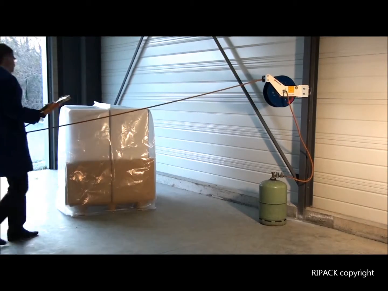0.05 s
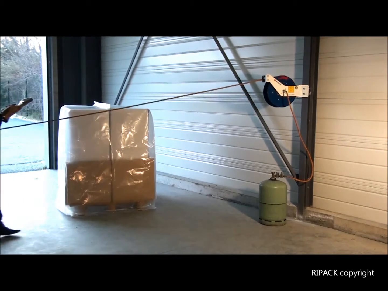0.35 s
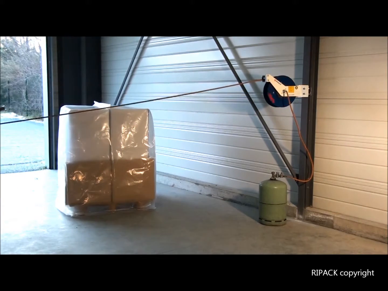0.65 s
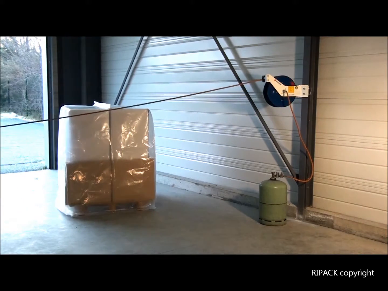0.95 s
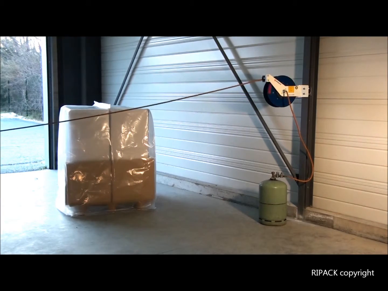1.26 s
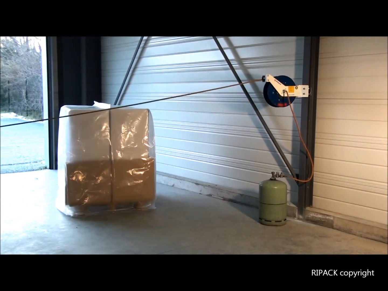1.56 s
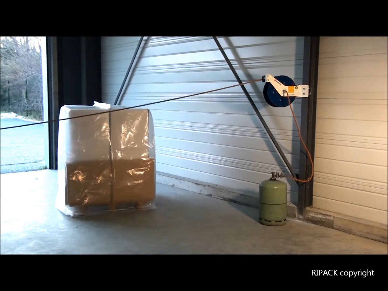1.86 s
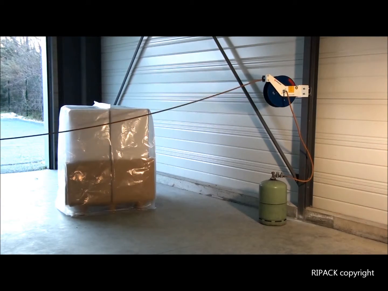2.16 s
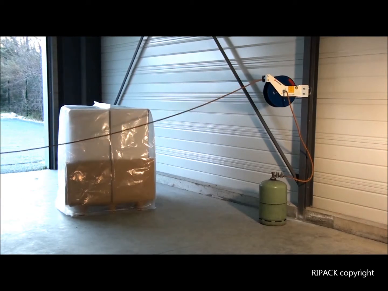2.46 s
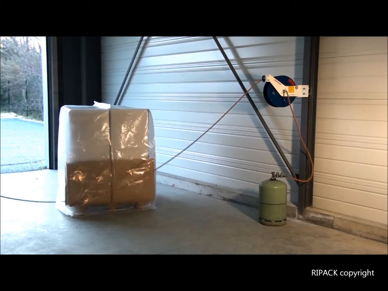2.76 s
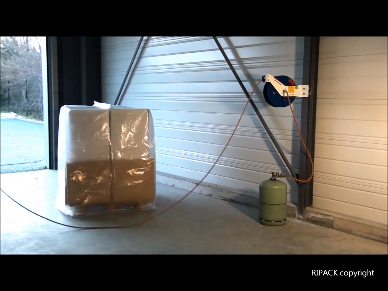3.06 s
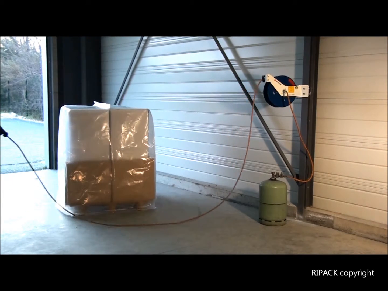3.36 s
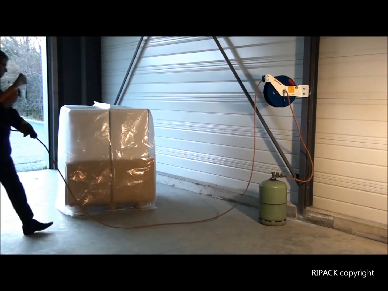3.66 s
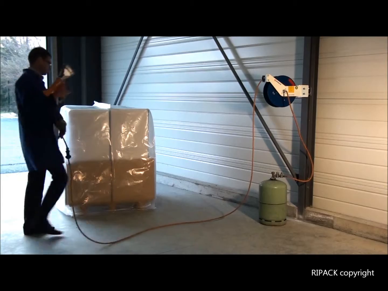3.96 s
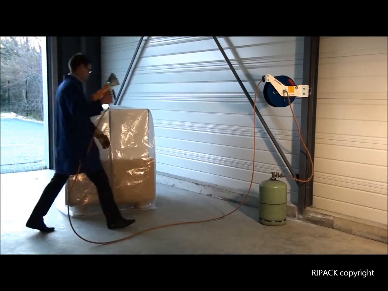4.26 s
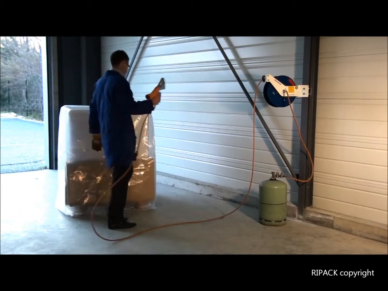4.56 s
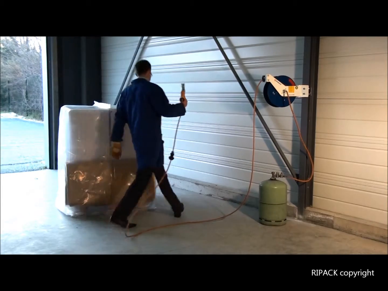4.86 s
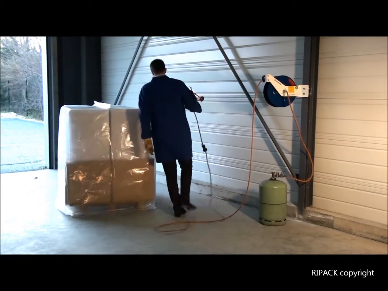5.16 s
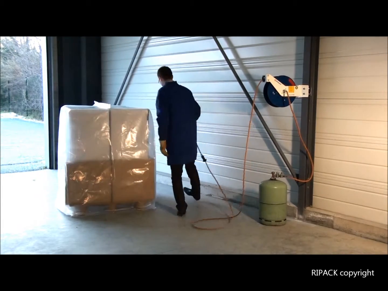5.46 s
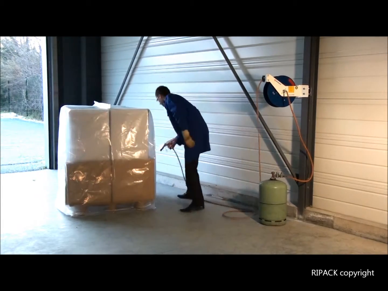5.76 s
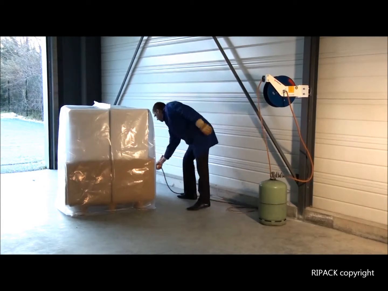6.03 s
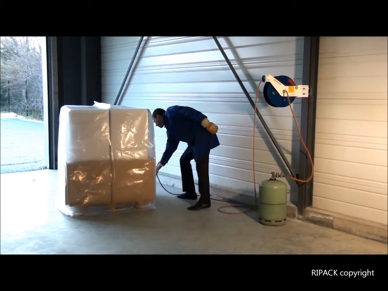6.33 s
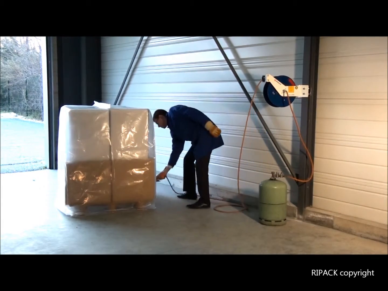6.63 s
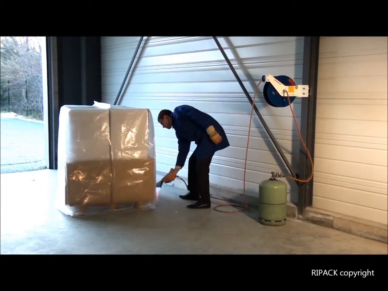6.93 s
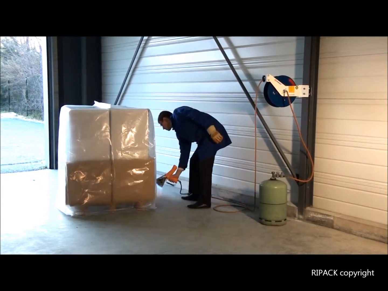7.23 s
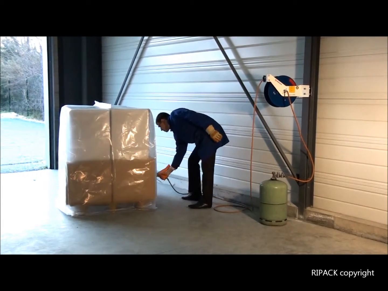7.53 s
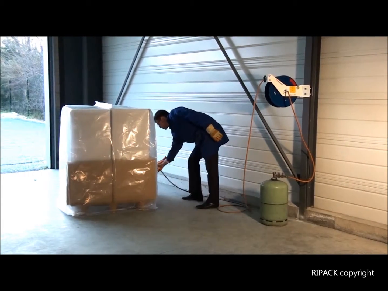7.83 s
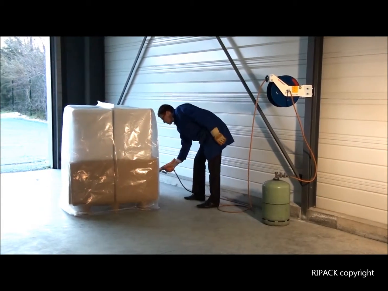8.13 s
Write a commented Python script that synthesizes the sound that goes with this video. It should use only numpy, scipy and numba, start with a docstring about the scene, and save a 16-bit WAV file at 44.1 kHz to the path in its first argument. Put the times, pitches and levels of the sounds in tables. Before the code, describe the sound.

A wall hose reel ratchets in runs of clicks and locks, then a gas burner lights and roars in a humming warehouse.

```python
"""Over the hum of a steel-clad warehouse, hose is pulled off a wall reel: the axle squeaks and once a turn
the pawl runs over a toothed arc. The reel locks with a boom of the cladding. The slack hose slaps the
concrete and drags, among soft footfalls and handling ticks. A hand-held gas burner is opened, hisses,
lights with a thump and roars. Throughout, a fast gain control holds clicks and flame at one level."""
import sys
import numpy as np
from scipy import signal
from scipy.fft import rfft, irfft, next_fast_len
from scipy.io import wavfile
from scipy.ndimage import uniform_filter1d, minimum_filter1d
from numba import njit

SR = 44100
rng = np.random.default_rng(int(sys.argv[2]) if len(sys.argv) > 2 else 0)


def transcribe(u):
    """Save the signal u as a 16-bit wav file named by the first command-line argument.

    u: samples, shape (n,) or (channels, n), limited to [-1, 1]; the rate is SR.
    q: integer samples, one column per channel.
    """
    v = np.clip(np.atleast_2d(u).T, -1, 1)
    q = np.round(v * 32767).astype(np.int16)
    wavfile.write(sys.argv[1], SR, q)


N = 365588
LEAD = SR // 2  # samples before time zero; the reel is already turning
TIME_S = np.arange(N) / SR


def undb(db):
    """Decibels to gain."""
    return 10 ** (np.asarray(db) / 20)


def unit(x):
    """Scale to rms 1."""
    return x / np.sqrt(np.mean(x ** 2))


def lookup(points, freq_hz):
    """Interpolate (freq_hz, value) points on a log-frequency axis."""
    hz, value = np.transpose(points)
    return np.interp(np.log(freq_hz + 1), np.log(hz), value)


def colour(x, points):
    """Filter by (freq_hz, gain_db) points, rolling off below the first."""
    n = x.shape[-1]
    size = next_fast_len(n)
    f = np.fft.rfftfreq(size, 1 / SR)
    gain = undb(lookup(points, f)) * np.minimum(f / points[0][0], 1) ** 2
    return irfft(rfft(x, size) * gain, size)[..., :n]


def resonate(x, peaks):
    """Parallel resonances, rms 1."""
    bands = (undb(db) * signal.lfilter(*signal.iirpeak(hz, hz / width_hz, SR), x)
             for hz, width_hz, db in peaks)
    return unit(sum(bands))


def walk(rate_hz):
    """Smooth random wander, spread near 1."""
    hold = int(SR / rate_hz)
    steps = np.repeat(rng.standard_normal(N // hold + 2), hold)
    return 1.3 * uniform_filter1d(steps, hold)[:N]


def switch(at_s, rise_s):
    """Smooth step from 0 to 1."""
    progress = np.clip((TIME_S - at_s) / rise_s, 0, 1)
    return np.sin(np.pi / 2 * progress) ** 2


# stereo width of the noise: freq_hz, side_minus_mid_db
WIDTH = [(30, -28), (60, -30), (125, -23), (250, -17), (500, -14.5), (1200, -11.5), (4000, -6),
         (8000, -8.5), (12000, -16.5), (16000, -67)]
def stereo_noise(n):
    """Noise that is near mono in the bass, widest around 4 kHz, near mono again at the top."""
    mid, side = rng.standard_normal((2, n))
    side = colour(side, WIDTH)
    return np.array([mid + side, mid - side])


def rush(points):
    """Coloured stereo noise, rms 1."""
    return unit(colour(stereo_noise(N), points))


def convolve(x, response):
    """Pass a signal through a response, keeping its length."""
    return signal.fftconvolve(np.atleast_2d(x), response, axes=1)[:, :x.shape[-1]]


# hall decay: freq_hz, t60_s
HALL_T60 = [(100, 1.24), (500, 1.44), (1300, 1.155), (3000, 1), (5000, 0.84), (8000, 0.62), (12000, 0.41),
            (16000, 0.4)]
def hall_response(build_s=0.018):
    """Echoes thicken, then die away, treble first."""
    t = np.arange(3 * SR // 2) / SR
    f, frame_s, spectrum = signal.stft(stereo_noise(len(t)), SR, nperseg=256)
    fade = np.exp(-np.log(1000) * frame_s / lookup(HALL_T60, f)[:, None])
    tail = signal.istft(spectrum * fade, SR)[1][:, :len(t)]
    return tail * (1 - np.exp(-t / build_s)) / np.sqrt(SR / 20)


def near_walls(spread_s):
    """Direct sound and dense first reflections from cladding and floor."""
    t = np.arange(SR // 20) / SR
    return stereo_noise(len(t)) * np.exp(-(t / spread_s) ** 2) / np.sqrt(spread_s * SR / 2)


def blows(rows, chatter_s, chatter_db):
    """Force of (start_s, force_db) blows: one sharp contact each, then brief random chatter."""
    force = np.zeros(LEAD + N + SR)
    t = np.arange(SR // 20) / SR
    for start_s, force_db in rows:
        burst = rng.standard_normal(len(t)) * np.exp(-t / chatter_s)
        burst *= undb(chatter_db) / np.linalg.norm(burst)
        burst[0] += 1
        i = LEAD + int(start_s * SR)
        force[i:i + len(t)] += undb(force_db) * burst / np.linalg.norm(burst)
    return force[:LEAD + N]


def hits(rows, points, hall, spread_s, near_db, echo_db):
    """Blows of one colour, heard nearby and through the hall."""
    force = colour(blows(rows, chatter_s=0.004, chatter_db=7), points)
    return undb(near_db) * convolve(force, near_walls(spread_s)) + undb(echo_db) * convolve(force, hall)


# plant and outdoor air: freq_hz, gain_db
AIR_COLOUR = [(25, -26), (42, -16), (58, 4), (75, -5.5), (115, 2.5), (190, 0), (300, -5), (450, -6.5),
              (750, -10.5), (1300, -13.5), (2500, -21), (5000, -31.5), (15000, -36)]
# hum partials: pitch_hz, level_db
HUM = [(60, -47), (122, -47), (187, -42.5), (377, -44)]
def background(air_db=-32.5, creep_db_per_s=1.82, level_at_s=5.2):
    """Steady murmur and wavering hum, heard slowly louder as if the gain creeps up, then level."""
    air = undb(air_db + 0.5 * walk(6)) * rush(AIR_COLOUR)
    hum = sum(undb(db + 1.9 * walk(4.93)) * np.sin(2 * np.pi * hz * TIME_S + 0.88 * walk(4))
              for hz, db in HUM)
    return (air + hum) * undb(-creep_db_per_s * np.maximum(level_at_s - TIME_S, 0))


# sliding friction: freq_hz, gain_db
SLIDE_COLOUR = [(2000, -1), (5500, -12), (7500, -3), (9000, -0.5), (11000, -5.5), (13000, -14),
                (15500, -27)]
# hose and coat swishes: centre_s, half_length_s, level_db
SWISHES = [(3.91, .13, -48.5), (4.99, .07, -55), (5.35, 0.064, -53)]
def hose_drag(start_s=2.98, drag_db=-50.5):
    """The hose is dragged over concrete; hose and coat swish now and then."""
    drag = undb(drag_db) * switch(start_s, rise_s=0.35)
    swishes = sum(undb(db) * np.exp(-((TIME_S - centre_s) / half_s) ** 2)
                  for centre_s, half_s, db in SWISHES)
    return rush(SLIDE_COLOUR) * (drag + swishes) * undb(0.76 * walk(32))


# footfalls: start_s, force_db
STEPS = [(3.74, 0.5), (4.38, -0.5), (4.93, 1)]
# foot on floor: freq_hz, gain_db
STEP_COLOUR = [(50, -4), (150, 11.5), (600, 7), (1500, -28), (6000, -38)]
def footfalls(hall):
    """Feet land with soft, low thuds."""
    return hits(STEPS, STEP_COLOUR, hall, spread_s=0.022, near_db=1.5, echo_db=0)


# hose landings: start_s, force_db
SLAPS = [(2.945, -1.5), (2.99, -3), (3.05, -2.5), (3.12, -1)]
# hose on concrete: freq_hz, gain_db
SLAP_COLOUR = [(300, -17), (800, -3), (1200, 5.5), (2000, 0), (3300, 0), (5200, -9.5), (7000, -15),
               (14000, -24)]
def hose_slaps(hall):
    """The slack hose drops onto the concrete."""
    return hits(SLAPS, SLAP_COLOUR, hall, spread_s=0.017, near_db=-5, echo_db=6.5)


# burner handling: start_s, force_db
TICKS = [(3.177, 8.5), (3.65, -5), (5.04, 6.5), (5.277, 1), (5.32, -3), (5.555, 18), (5.583, 24)]
# tick spectrum: freq_hz, gain_db
TICK_COLOUR = [(500, -25), (2500, -2), (5500, -8), (9500, 3.5), (15000, -24)]
def burner_ticks(hall):
    """Handle, trigger and igniter make small, bright contacts."""
    return hits(TICKS, TICK_COLOUR, hall, spread_s=0.0054, near_db=-14, echo_db=-14)


# locking blows: start_s, force_db
LATCH = [(2.2765, -1.5), (2.285, -4), (2.325, -8)]
# latch clack: freq_hz, gain_db
LATCH_COLOUR = [(200, -16), (450, -6.5), (800, -2), (1050, 0.5), (1400, -2.5), (2050, 4), (2900, -5.5),
                (3250, -1), (4200, -2), (5800, -9), (7500, -3), (10000, -8.5), (15000, -24)]
# cladding boom: freq_hz, gain_db
WALL_COLOUR = [(45, -14), (80, 3), (130, 0), (200, -3), (290, -4.5), (380, -13), (520, -8), (750, -10),
               (3000, -45)]
def reel_lock(hall):
    """The reel falls back and locks; the cladding behind it booms."""
    clack = hits(LATCH, LATCH_COLOUR, hall, spread_s=0.01, near_db=19.5, echo_db=23.5)
    boom = hits(LATCH, WALL_COLOUR, hall, spread_s=0.027, near_db=13, echo_db=28.5)
    return clack + boom


# axle squeaks: start_s, length_s, pitch_hz, level_db
SQUEAKS = [(.15, 0.23, 1288, -15.5), (0.37, .11, 2246, -16), (0.941, 0.2, 1304, -16),
           (1.792, 0.15, 1310, -20)]
def axle(phase_step_rad=0.071):
    """The dry bearing squeaks unsteadily as the drum turns."""
    out = np.zeros(N)
    for start_s, length_s, hz, db in SQUEAKS:
        span = slice(int(start_s * SR), int((start_s + length_s) * SR))
        t = TIME_S[span]
        drift_rad = phase_step_rad * np.cumsum(rng.standard_normal(SR))[:len(t)]
        out[span] += undb(db) * np.hanning(len(t)) * np.sin(2 * np.pi * hz * t + drift_rad)
    return np.pad(out, (LEAD, 0))


# passes over the arc: start_s, tooth_count, start_rate_hz, end_rate_hz, braking_exponent, force_db
TURNS = [(-.37, 12, 45.93, 45.4, 1, -4), (0.1724, 12, 49.14, 25.96, .782, -1.5),
         (.976, 12, 48.1, 46.2, .488, -1), (1.8175, 9, 31.24, 18, 4.45, -2.5)]
def tooth_drops(jitter_s=0.0007, fade_db=-3, scatter_db=2.5, first_tooth_db=2):
    """Time and force of each uneven tooth: the drum slows and the pawl softens as the pull eases."""
    rows = []
    for start_s, count, start_hz, end_hz, braking, turn_db in TURNS:
        offset, unevenness = rng.standard_normal((count, 2)).T
        rate_hz = start_hz + (end_hz - start_hz) * np.linspace(0, 1, count - 1) ** braking
        times_s = start_s + np.append(0, np.cumsum(1 / rate_hz) + jitter_s * offset[1:])
        force_db = turn_db + fade_db * np.linspace(0, 1, count) + scatter_db * unevenness
        force_db[0] = turn_db + first_tooth_db
        rows += zip(times_s, force_db)
    return rows


def steel_ring(modes):
    """Response of struck steel: decaying sines, each scaled by its energy."""
    t = np.arange(SR // 2) / SR
    response = np.zeros((1, len(t)))
    for hz, energy_db, t60_s in modes:
        decay_per_s = np.log(1000) / t60_s
        amplitude = undb(energy_db) * np.sqrt(4 * decay_per_s / SR)
        response += amplitude * np.sin(2 * np.pi * hz * t) * np.exp(-decay_per_s * t)
    return response


# the arc knocks the pawl aside: start_s, force_db
KNOCKS = [(0.1154, -5.5), (0.9151, -3), (1.716, -10)]
# steel bracket and pawl: pitch_hz, energy_db, t60_s
REEL_MODES = [(1288, -4, .12), (1336, -6, .12), (2252, -6, .12), (2490, -9, .08), (2620, -10, .08),
              (3166, -7, .35), (3240, -4, .4), (3312, -7, .35), (3490, -12, .15), (4800, -6, .15),
              (5285, -11, .1), (5660, -11, .1), (6140, -12, .08), (7155, -10, .08), (7930, -7, .05),
              (8470, -1, .035), (8840, -8, .05), (10070, -3, .045)]
# drum clatter: freq_hz, gain_db
DRUM_COLOUR = [(200, -66), (600, -23), (850, -7.5), (1300, 1.5), (1950, 0), (2500, 2.5), (2850, -5.5),
               (3300, 4.5), (4100, 0), (6800, 2.5), (8300, 6), (10000, -1), (12500, -6.5), (15500, -10.5)]
# pawl snap: freq_hz, gain_db
SNAP_COLOUR = [(500, -36), (1300, -17), (3000, -22), (6500, -17), (7600, 5.5), (8400, 7.5), (10200, 13.5),
               (11300, 0.5), (12500, 9), (13500, 1), (15500, -9)]
def ratchet(hall, bounce_s=0.007, bounce_db=-8, ping_hz=8390):
    """The pawl is knocked aside, bounces and snaps over the teeth; drum and bracket ring, axle squeaks."""
    teeth = blows(tooth_drops(), chatter_s=0.0053, chatter_db=14.5)
    bounces = [(start_s + bounce_s, db + bounce_db) for start_s, db in KNOCKS]
    knocks = blows(KNOCKS + bounces, chatter_s=0.003, chatter_db=16)
    force = teeth + undb(-1) * knocks
    steel = undb(7) * convolve(force, steel_ring(REEL_MODES))[0]
    body = undb(26) * colour(force, DRUM_COLOUR) + steel
    snap = undb(14) * colour(teeth + undb(-10.5) * knocks, SNAP_COLOUR)
    squeak = axle()
    # thrown clear of the teeth, the pawl rings freely
    ping = undb(16) * convolve(knocks, steel_ring([(ping_hz, 0, 0.043)]))
    direct = ping + squeak + undb(-9) * steel
    near = convolve(snap + undb(-9) * body, near_walls(spread_s=0.0079))
    echo = convolve(undb(-1) * body + undb(-3) * snap + undb(-7) * squeak, hall)
    return direct + near + echo


VALVE_S, IGNITION_S = 5.403, 5.671
FLAME_AGE_S = np.maximum(TIME_S - IGNITION_S, 0)
def ignition(swing_hz=78, swing_s=0.032, boom_s=0.2):
    """Gathered gas burns at once: a low pressure swing, then a boom in the hall."""
    swing = np.sin(2 * np.pi * swing_hz * FLAME_AGE_S) * np.exp(-(FLAME_AGE_S / swing_s) ** 2)
    boom_colour = [(28, -3), (60, 0), (140, 0), (400, -30), (3000, -60)]  # freq_hz, gain_db
    boom = rush(boom_colour) * np.exp(-FLAME_AGE_S / boom_s)
    return undb(-9) * swing + undb(-19) * boom


# relative levels as the burner is swung about: time_s, hiss_db, roar_db, buffet_db
BURN = [(5.5, -15.5, -20, -26.5), (5.8, -18, -18, -26.5), (6.25, -19.0, -17.5, -27),
        (6.5, -19.0, -18, -33.5), (6.77, -25, -19.5, -32), (7.1, -24.5, -17.5, -29.5),
        (7.45, -23, -15.5, -32), (7.65, -23, -18.0, -29), (7.88, -17.5, -18.5, -23),
        (8.07, -19.5, -16.5, -32), (8.27, -21.5, -18, -28.0)]
# gas jet: freq_hz, gain_db
JET_COLOUR = [(400, -21), (1500, -8.5), (3000, -6), (5300, -10.5), (6300, -7), (7500, -1.5), (8100, -1),
              (8480, 4), (9100, -0.5), (10400, -0.5), (11800, -7), (13300, -10), (14300, -13), (15600, -15)]
# air column of the cold tube: pitch_hz, width_hz, gain_db
TUBE_MODES = [(75, 27, -6), (189, 27, -5.5), (580, 87, 1.5), (913, 100, -1.5), (1386, 52, -4),
              (1680, 130, -1.5), (2100, 200, -8), (2500, 90, -1), (3240, 160, -4.5), (3750, 140, -7),
              (4230, 300, -9)]
# flame-driven resonances: pitch_hz, width_hz, gain_db
FLAME_MODES = [(121.5, 7.2, -1), (259.4, 5.9, 8), (538, 15, -1), (579, 22, -2), (742, 6.1, 5.5),
               (1140, 6.7, -7)]
# flame roar: freq_hz, gain_db
ROAR_COLOUR = [(130, -28), (195, -8.5), (225, -2), (275, -1), (335, -7), (420, -5.5), (560, -4),
               (700, -7.5), (820, -12), (930, -6.5), (1150, -19), (2500, -37.5)]
# low buffeting: freq_hz, gain_db
BUFFET_COLOUR = [(25, -24), (50, -18), (80, -3), (122, 5.5), (165, 2), (260, -26)]
# flame tearing: freq_hz, gain_db
TEAR_COLOUR = [(500, -2.5), (1100, -1.5), (1600, 1.5), (2300, -1), (2900, -6), (3400, -5), (4300, -12.5),
               (6000, -13), (12000, -34)]
def burner(flare_db=5, flare_s=0.45, tear_db_per_jet_db=0.36):
    """Gas hisses through the cold tube; lit, the turbulent flame roars and tears as the jet swells."""
    times_s, *levels_db = np.transpose(BURN)
    hiss_db, roar_db, buffet_db = (np.interp(TIME_S, times_s, db) for db in levels_db)
    gas, lit = switch(VALVE_S, rise_s=0.062), switch(IGNITION_S, rise_s=0.021)
    cold = 1 - switch(IGNITION_S, rise_s=0.3)
    jet = rush(JET_COLOUR) * undb(4 + hiss_db + 0.35 * walk(30))
    tube = resonate(stereo_noise(N), TUBE_MODES) * undb(-17) * cold
    flutter = walk(28)
    hollow = resonate(stereo_noise(N), FLAME_MODES) * undb(-19.5 + 1.4 * walk(4))
    roar = (rush(ROAR_COLOUR) * undb(4 + roar_db) + hollow) * undb(0.73 * flutter)
    flare = np.exp(-FLAME_AGE_S / flare_s)
    buffet = rush(BUFFET_COLOUR) * undb(3 + buffet_db + flare_db * flare + 0.92 * flutter)
    swell_db = tear_db_per_jet_db * (hiss_db - np.average(hiss_db, weights=lit))
    tear = rush(TEAR_COLOUR) * undb(-16 + swell_db + 0.49 * flutter + 0.62 * walk(220))
    return gas * (jet + tube) + lit * (roar + buffet + tear + ignition())


def scene():
    """Reel, handling and burner in one hall."""
    hall = hall_response()
    struck = ratchet(hall) + reel_lock(hall) + hose_slaps(hall) + burner_ticks(hall) + footfalls(hall)
    return struck[:, LEAD:] + hose_drag() + background() + undb(7) * burner()


# port balance: freq_hz, left_minus_right_db
PORT_BALANCE = [(40, 0), (500, 1.1), (1500, 0), (4000, 0.5), (8000, -1), (12000, -0.5)]
# port phase: freq_hz, left_lead_rad
PORT_PHASE = [(30, 0), (100, -0.056), (250, -0.28), (550, -0.63), (850, -0.68), (1300, -0.8), (2500, -0.28),
              (4500, -0.46), (6200, -0.55), (10000, -0.18), (15000, -0.38)]
def capsules(dry):
    """The two microphone ports differ slightly in level and phase."""
    size = next_fast_len(N + SR // 10)
    f = np.fft.rfftfreq(size, 1 / SR)
    tilt = undb(lookup(PORT_BALANCE, f) / 2) * np.exp(0.5j * lookup(PORT_PHASE, f))
    return irfft(rfft(dry, size) * np.array([tilt, 1 / tilt]), size)[:, :N]


@njit
def follow(x, attack, release):
    """Level follower with separate rise and fall coefficients."""
    out, level = np.empty(len(x)), x[:200].max()
    for i in range(len(x)):
        level += (x[i] - level) * (attack if x[i] > level else release)
        out[i] = level
    return out


def record(dry, threshold_db=-5, attack_s=0.00057, release_s=0.069, ratio=14, cutoff_hz=15750):
    """Two capsules, fast gain control, rounded peaks, steep top cut."""
    x = capsules(dry)
    level = follow(np.abs(x).max(axis=0), 1 / (attack_s * SR), 1 / (release_s * SR))
    gain = np.minimum(undb(threshold_db) / (level + 1e-9), 1) ** (1 - 1 / ratio)
    gain = uniform_filter1d(minimum_filter1d(gain, size=180), size=60)  # look-ahead against overshoot
    rounded = 2 * np.tanh(x * gain / 2)
    return signal.sosfilt(signal.ellip(10, 0.2, 80, cutoff_hz, fs=SR, output="sos"), rounded)


dry = scene()
out = record(dry)
transcribe(out)
```